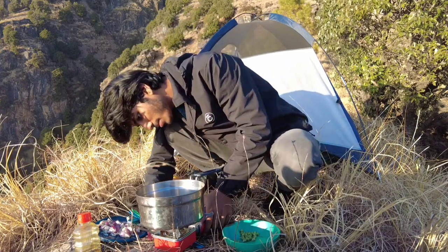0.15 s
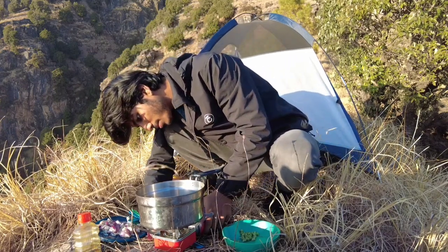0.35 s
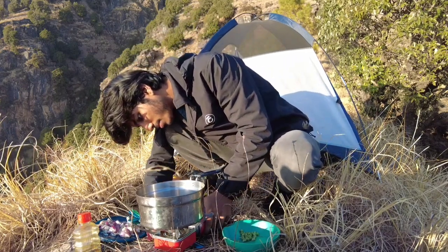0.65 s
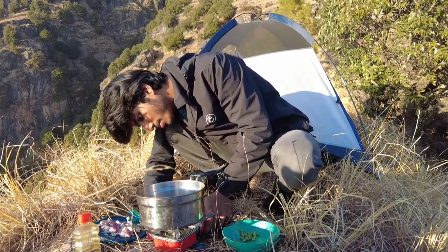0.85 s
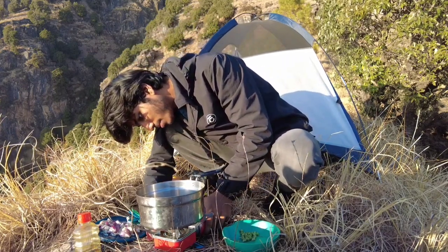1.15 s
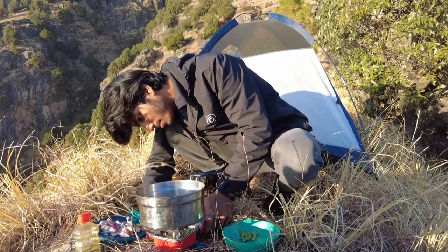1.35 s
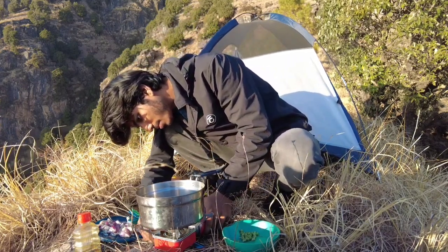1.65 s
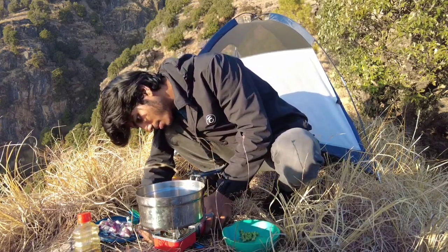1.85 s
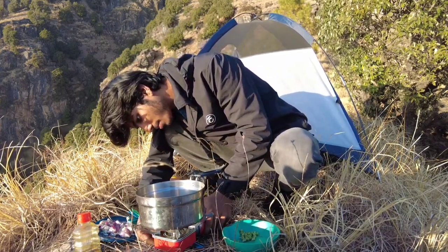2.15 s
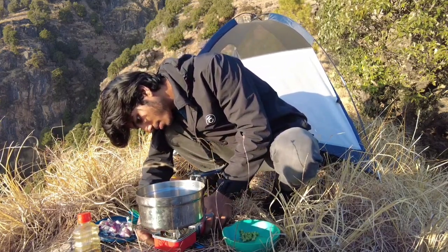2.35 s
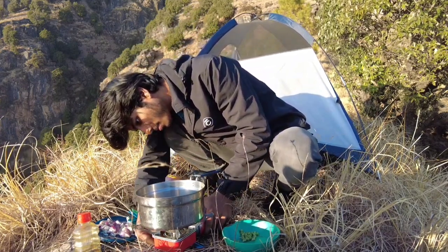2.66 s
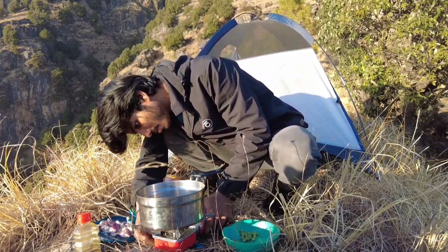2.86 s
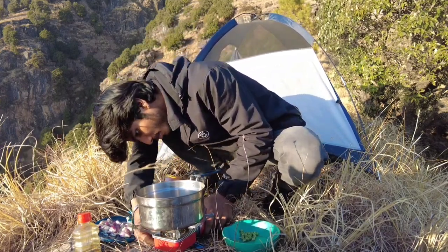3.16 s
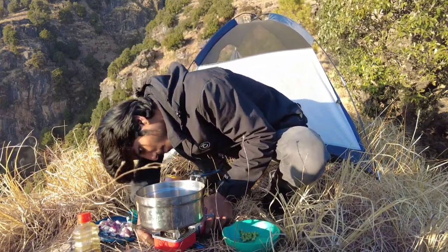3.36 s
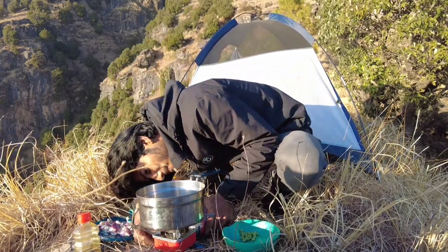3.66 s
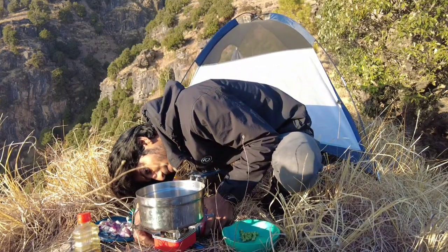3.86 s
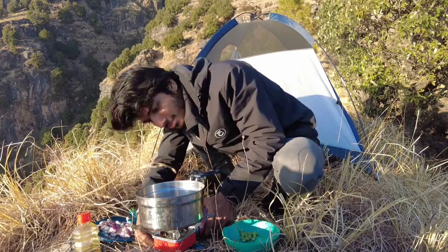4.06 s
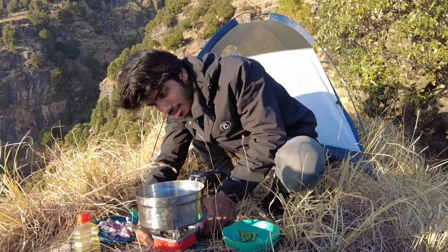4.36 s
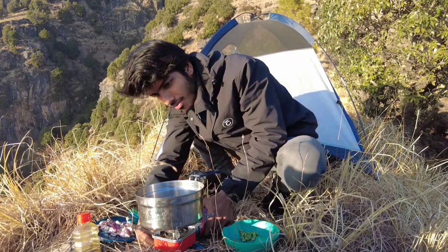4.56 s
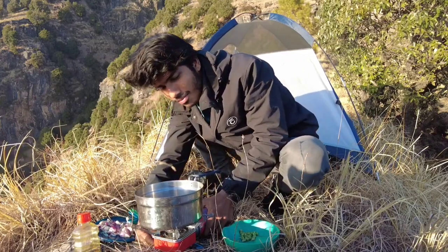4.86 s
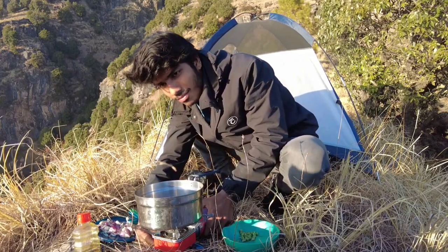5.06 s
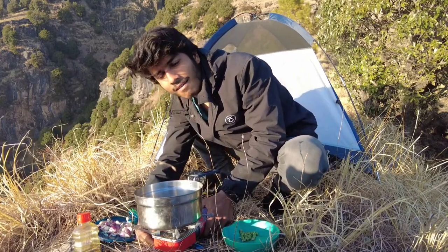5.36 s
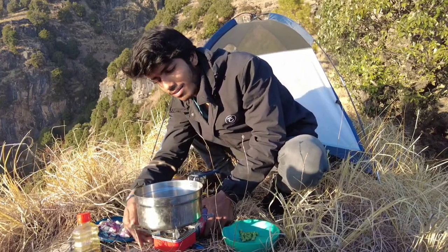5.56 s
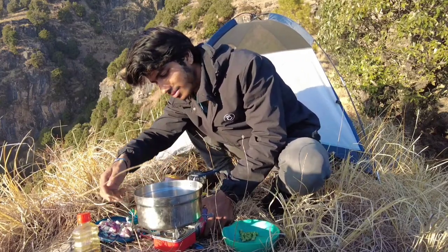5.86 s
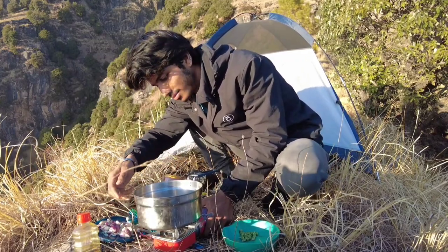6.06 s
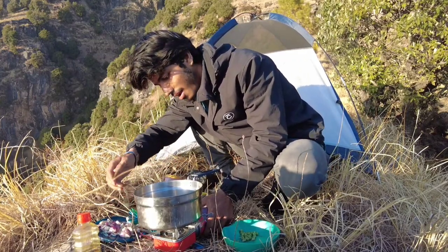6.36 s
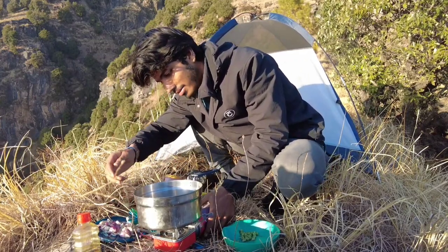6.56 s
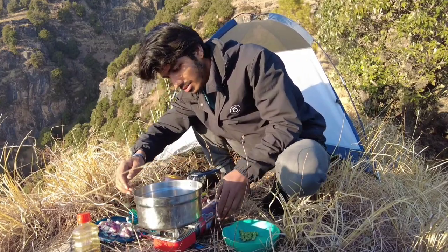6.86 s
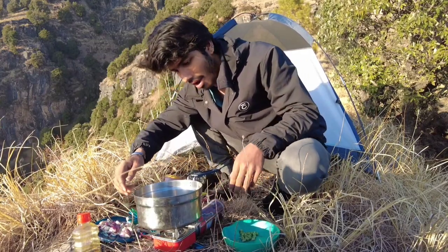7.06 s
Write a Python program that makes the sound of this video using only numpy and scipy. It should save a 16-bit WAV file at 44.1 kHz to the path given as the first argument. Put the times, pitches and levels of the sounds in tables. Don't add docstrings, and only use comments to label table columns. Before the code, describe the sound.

A small gas stove's igniter snaps eight times outdoors, each with a metallic ring and faint tick back, until gas catches with a low thump.

```python
import sys
import numpy as np
from scipy import signal
from scipy.fft import rfft, irfft
from scipy.io import wavfile
from scipy.ndimage import uniform_filter1d

SR = 44100
rng = np.random.default_rng(int(sys.argv[2]) if len(sys.argv) > 2 else 0)


def store_pcm(level_fs):
    pcm = np.round(np.clip(level_fs, -1, 1) * 32767).astype(np.int16)
    wavfile.write(sys.argv[1], SR, np.atleast_2d(pcm).T)


def convert_level_to_amplitude(level_db):
    exponent = np.asarray(level_db, float) / 20
    return 10 ** exponent


N = 318222

# t/s, peak level/dB, rattle level/dB, lead-in level/dB, pot level/dB
SNAPS = [
    (2.2938, -25, 6.5, -48, -32),
    (2.8259, -24, 4.5, -13.5, -35.5),
    (4.0403, -23.5, 6, -23.5, -33.5),
    (4.2994, -22, 2.5, -43, -38.5),
    (4.5279, -21, 0.5, -18.5, -35),
    (4.7591, -20.5, 1, -42, -34.5),
    (4.9922, -20, 2, -22, -37),
    (5.201, -20.5, 1.5, -20, -35),
]
# t/s, peak level/dB, lead-in level/dB
TICKS = [
    (2.5754, -44.5, -22),
    (3.0788, -41.5, -7),
    (4.2092, -36, -28),
    (4.4464, -38.5, -8),
    (4.6604, -37.5, -9),
    (4.8822, -37.5, -8),
    (5.1196, -40.5, -9),
    (5.3175, -38, -24),
]
# t/s, peak level/dB
TAPS = [
    (2.4756, -51),
    (3.0048, -53),
    (5.352, -50),
    (5.4907, -41),
]
# t/s, peak level/dB
STALKS = [
    (0.141, -57),
    (0.254, -54.5),
    (0.6887, -62.5),
    (0.9765, -63),
    (1.094, -58),
    (1.4367, -51),
    (3.649, -51.5),
    (3.7323, -43),
    (3.8651, -59),
]
# f/Hz, level/dB
RATTLE_TONE = [(150, -61), (400, -18), (900, -22.5), (1500, 3), (2200, -6.5), (4500, -3), (8000, -2),
               (12500, 1.5), (15600, 4.5), (16600, -9), (17200, -11)]
# f/Hz, level/dB
SCATTER_TONE = [(300, -54), (600, 3), (1300, -1), (2000, 5.5), (3000, 6), (5000, -0.5), (10000, -15.5),
                (16000, -14)]
# f/Hz, level/dB, t60/s
SHELL = [(738, -2.5, 0.014), (1296, -10, 0.087), (1614, -2.5, 0.039), (1781, -14, 0.08), (2665, 4, 0.021),
         (3380, -0.5, 0.029), (7570, 0.5, 0.023)]
FRAME = [(1200, -12, 0.18), (1195, -2.5, 0.22), (1316, 6, 0.065), (1332, -2.5, 0.2), (1535, 4.5, 0.14)]
POT = [(340, -5, .45), (490, 0, .5), (931, -4, .35), (1008, -1, .45), (1330, 1, .25)]
# f/Hz, phase/rad
SNAP_PHASE = [(300, 0.79), (1030, 1.1), (2000, 0.73), (4000, 1.26), (8000, 1.5), (13000, 2.04)]
# f/Hz, factor
SHADOW = [(300, .1), (1200, -.3), (2500, .5), (5000, .9), (14000, .8)]
# t/s, draw level/dB, draw length/ms, push level/dB, push length/ms
POCKETS = [
    (5.2, -60, 3, -28, 19),
    (5.2235, -23, 5.5, -22, 4.5),
    (5.233, -18.5, 6, -28, 2.5),
    (5.2412, -13.5, 8, -10.8, 11),
    (5.2675, -21, 15, -32, 14),
]
# t/s, level/dB
FLUTTER = [
    (5.2, -54),
    (5.22, -39),
    (5.236, -34),
    (5.252, -41),
    (5.28, -45),
    (5.3, -60),
    (5.35, -72),
    (5.5, -84),
]
# f/Hz, level/dB
FLAME_TONE = [(60, -22), (130, -8), (200, 4), (280, -10), (400, -5), (620, -9), (850, -19), (1300, -40)]
# f/Hz, level/dB
GAS_TONE = [(240, -51), (400, -19), (1250, -4), (2290, -8), (3120, -3.5), (3420, -3), (5690, -18.5),
            (16000, -22)]
# f/Hz, width/Hz, level/dB
BURNER = [(1375, 62, -2.5), (2470, 150, -1), (3138, 115, 2), (3610, 100, -4), (4080, 106, -3.5),
          (5586, 88, 1), (5980, 200, -6), (7780, 150, -6.5), (9050, 130, -6.5)]
# start t/s, open time/s, flow level/dB, sag/(dB/s)
VALVE = [
    (1.066, 0.026, -53, 1.5),
    (1.171, .2, -51.5, 42),
    (1.416, 0.383, -49, 26.5),
    (1.8, .15, -56.5, 9),
]
# t/s, level/dB
PILOT = [
    (1.07, -70.5),
    (2.2, -67.5),
    (3.3, -66),
    (4.0, -71.5),
    (4.8, -70.5),
    (5.18, -66),
    (5.4, -69),
    (6.0, -69),
    (7.22, -68),
]
# start t/s, length/s, level/dB
SHAKES = [
    (4.083, 1.38, -65.5),
    (6.898, .45, -65.5),
]
# f/Hz, width/Hz, level/dB
LOOSE = [(1060, 45, -5.5), (1160, 37, -5), (1330, 48, -1.5), (1470, 70, -2), (1580, 70, -6)]
# t/s, peak level/dB, f/Hz
KNOCKS = [
    (3.221, -29.5, 196),
    (3.2755, -38, 1500),
    (5.492, -42, 1630),
    (5.958, -38, 102),
    (6.631, -46, 1200),
    (6.863, -50, 184),
]
# t/s, level/dB
MOTION = [(0.0, -69), (0.35, -75), (0.7, -76), (0.73, -80.5), (1.05, -85), (1.1, -74.5), (1.34, -71.5),
          (1.5, -68), (3.09, -73.5), (3.21, -61), (3.45, -66), (3.75, -64.5), (4.06, -70), (5.31, -68.5),
          (6.1, -71.5), (6.25, -75.5), (6.86, -69.5), (7.1, -64)]
# f/Hz, level/dB
SWISH_TONE = [(150, -15), (400, -4), (700, 0), (1000, -4), (1400, 1), (1900, -2.5), (3000, -6), (6000, -20),
              (9000, -42)]
# f/Hz, level/dB
FIZZ_TONE = [(1000, -20), (2500, -1.5), (5000, 0), (9000, -1), (11500, -6), (14000, 0.5), (16500, -4)]
# t/s, peak level/dB, f/Hz
CHIRPS = [
    (0.3544, -67, 5470),
    (0.4823, -73, 5280),
    (0.5157, -67, 5240),
    (0.5626, -71, 5280),
    (0.6145, -67, 5320),
    (0.6898, -69, 5330),
    (0.7153, -69, 5400),
]
# f/Hz, level/dB
WIND_TONE = [(8.8, -27.5), (15, 2.5), (32, 2.5), (75, -7.5), (103, -5), (414, -27), (447, -36.5),
             (600, -26.5), (780, -78), (1320, -120)]
# middle t/s, half length/s, rise/dB
GUSTS = [
    (.45, 0.72, 2),
    (1.3, 0.21, 1.5),
    (2.9, 0.43, 4.5),
    (3.75, 0.27, 6.5),
    (4.64, 0.26, 3.5),
    (5.306, 0.23, 5.5),
    (5.785, 0.28, 8),
    (6.505, 0.16, 4.5),
    (7.026, 0.13, 6),
]
# f/Hz, likeness
SAME = [(60, 0.99), (180, 0.96), (550, 0.3), (1650, 0.7), (4970, 0.68), (15000, -0.31)]

PRESS_S = 0.026
PORT_LEAD_S = 3.4e-5


def evened(x):
    return x / np.sqrt(np.mean(x ** 2) + 1e-20)


def read(points, hz):
    f, value = np.transpose(points)
    return np.interp(np.log(hz + 1), np.log(f + 1), value)


def follow(rows):
    s, db = np.transpose(rows)
    return convert_level_to_amplitude(np.interp(np.arange(N) / SR, s, db, left=-150))


def add(mix, s, sound):
    part = mix[..., round(s * SR):][..., :sound.shape[-1]]
    part += sound[..., :part.shape[-1]]


def hiss(tone, size, patchy_db, flicker_db, peaks=(), peak_db=0):
    hop, hz = size // 4, np.fft.rfftfreq(size, 1 / SR)
    frames = N // hop + 5
    a, b, c, d, patches = rng.standard_normal((frames, len(hz), 5)).T
    patches = uniform_filter1d(patches, size=size // 64, axis=0)
    patches = evened(uniform_filter1d(patches, size=4096 // size + 4, axis=1))
    flicker = evened(uniform_filter1d(rng.standard_normal(frames), size=3))
    power = convert_level_to_amplitude(2 * read(tone, hz))
    for f, width, db in peaks:
        power += convert_level_to_amplitude(2 * (db + peak_db)) / (1 + (2 * (hz - f) / width) ** 2)
    same = np.clip(abs(read(SAME, hz)), 0, 1)[:, None]
    late = np.exp(-2j * np.pi * hz * PORT_LEAD_S)[:, None]
    left = a + 1j * b
    right = late * (same * left + np.sqrt(1 - same ** 2) * (c + 1j * d))
    z = np.array([left, right])
    z *= np.sqrt(power)[:, None] * convert_level_to_amplitude(patchy_db * patches + flicker_db * flicker)
    return evened(signal.istft(z, nperseg=size, noverlap=size - hop)[1][:, :N])


def ring(modes, spread_db, fuzz, t):
    hz, db, t60 = np.transpose(modes)[:, :, None]
    level_luck, pitch_luck = rng.standard_normal((2, len(modes), 1))
    waver = uniform_filter1d(rng.standard_normal((len(modes), len(t))), size=250)
    waver = 1 + fuzz * evened(uniform_filter1d(waver, size=150))
    onset = (1 - np.exp(-t / 0.00072)) ** 2
    level = convert_level_to_amplitude(db + spread_db * level_luck - 60 * t / t60) * onset
    return (level * waver * np.sin(2 * np.pi * hz * (1 + 0.0058 * pitch_luck) * t)).sum(0)


def click(db, rattle_db, press_db, run_up_ms, t60_ms, shell_db, frame_db, pot_db, pan_db, scatter_db=-16):
    t = np.arange(2 ** 14) / SR - PRESS_S
    run_up_ms = max(run_up_ms, 0.3)
    since = t - run_up_ms / 1000
    rise_db = 14 * since / run_up_ms * 1000 - 3000 * np.maximum(-t, 0)
    shape = convert_level_to_amplitude(np.where(since < 0, rise_db, -60000 * since / max(t60_ms, 5)))
    press = convert_level_to_amplitude(press_db + 570 * t) * (since < 0)
    hits = rng.standard_normal(len(t)) * convert_level_to_amplitude(1.8 * rng.exponential(1, len(t)))
    rattle = evened(hits) * (shape + press) + 0.5 * shape * rng.standard_normal((2, len(t)))
    scatter = rng.standard_normal((2, len(t))) * convert_level_to_amplitude(scatter_db - 60 * since / 0.2) * (since > 0)
    hz = np.fft.rfftfreq(len(t), 1 / SR)
    noise = convert_level_to_amplitude(rattle_db + read(RATTLE_TONE, hz)) * rfft(rattle)
    noise = noise + convert_level_to_amplitude(read(SCATTER_TONE, hz)) * rfft(scatter)

    after = np.maximum(since + 0.0026, 0)
    metal = convert_level_to_amplitude(shell_db) * ring(SHELL, 1.2, 0.3, after)
    metal += convert_level_to_amplitude(frame_db) * ring(FRAME, 1.2, 0.8, after)
    metal += convert_level_to_amplitude(pot_db) * ring(POT, 1.2, 0.2, after)
    bounce = np.roll(metal, round(rng.uniform(0.0047, 0.014) * SR)) * 0.28
    phase = np.exp(np.outer([0, -1j], read(SNAP_PHASE, hz)))
    ports = phase * convert_level_to_amplitude(np.outer([0.5, -0.5], pan_db * read(SHADOW, hz)))
    return convert_level_to_amplitude(db - 4.5) * irfft(ports * (noise + rfft(metal + bounce)), len(t))


def igniter():
    out = np.zeros((2, N))
    for s, db, rattle_db, press_db, pot_db in SNAPS:
        snap = click(db, rattle_db, press_db, run_up_ms=4.1, t60_ms=29,
                     shell_db=-1.5, frame_db=-19, pot_db=pot_db, pan_db=3.5)
        add(out, s - PRESS_S, snap)
    for s, db, press_db in TICKS:
        tick = click(db, 0.64, press_db, run_up_ms=1.814, t60_ms=43,
                     shell_db=-3, frame_db=-15, pot_db=-47, pan_db=0.5, scatter_db=-9)
        add(out, s - PRESS_S, tick)
    for s, db in TAPS:
        tap = click(db, -16, -30, run_up_ms=1.54, t60_ms=23,
                    shell_db=-7, frame_db=-19, pot_db=-43, pan_db=0.8, scatter_db=-18)
        add(out, s - PRESS_S, tap)
    for s, db in STALKS:
        stalk = click(db, 2.3, -14, run_up_ms=4.3, t60_ms=73,
                      shell_db=-22, frame_db=-42, pot_db=-60, pan_db=1.0)
        add(out, s - PRESS_S, stalk)
    return out


def puff(ms):
    return np.sin(np.pi * np.arange(0, 1, 1000 / ms / SR) ** 0.6)


def ignition():
    thump = np.zeros(N)
    for s, draw_db, draw_ms, push_db, push_ms in POCKETS:
        add(thump, s, np.r_[-convert_level_to_amplitude(draw_db) * puff(draw_ms), convert_level_to_amplitude(push_db) * puff(push_ms)])
    thump = uniform_filter1d(uniform_filter1d(thump, size=60), size=80)
    flame = hiss(FLAME_TONE + [(3000, -70)], size=512, patchy_db=1.0, flicker_db=0.5)
    return thump * convert_level_to_amplitude([[-1.1], [1.1]]) + flame * follow(FLUTTER)


def gas_flow():
    t = np.arange(N) / SR
    open_s, close_db_per_s = 0.028, 207
    power = follow(PILOT) ** 2
    for s, held_s, db, sag in VALVE:
        choke_db = close_db_per_s * np.maximum(t - s - held_s, 0)
        rush = np.clip((t - s) / open_s, 0, 1) * convert_level_to_amplitude(db - sag * abs(t - s) - choke_db)
        power += rush ** 2
    return np.sqrt(power)


def gas():
    jet = hiss(GAS_TONE, size=1024, patchy_db=2.0, flicker_db=0.56, peaks=BURNER, peak_db=2.5)
    return jet * gas_flow() * convert_level_to_amplitude(0.5) * convert_level_to_amplitude([[0.8], [-0.8]])


def buzz():
    t, fade_s = np.arange(N) / SR, 0.12
    held = np.zeros(N)
    for s, length, db in SHAKES:
        held += convert_level_to_amplitude(db) * np.clip(np.minimum(t - s, s + length - t) / fade_s, 0, 1)
    bed = [(500, -50), (1300, -25), (3000, -45)]  # f/Hz, level/dB
    return held * hiss(bed, size=2048, patchy_db=3.0, flicker_db=1.5, peaks=LOOSE)


def knocks():
    out, t = np.zeros(N), np.arange(2000) / SR
    for s, db, hz in KNOCKS:
        add(out, s, -convert_level_to_amplitude(db - 7.0 - 60 * t / 0.02) * np.sin(2 * np.pi * hz * t))
    return out


def jacket_and_grass():
    still_db, grass_db, grass_share = -70.5, -70, 0.74
    moving = follow(MOTION)
    swish = hiss(SWISH_TONE, size=512, patchy_db=-0.5, flicker_db=1.5) * moving * convert_level_to_amplitude(1.0)
    grass = convert_level_to_amplitude(grass_db + 3.5) * (moving / convert_level_to_amplitude(still_db)) ** grass_share
    return swish + hiss(FIZZ_TONE, size=256, patchy_db=3.5, flicker_db=1.5) * grass


def insect():
    out, t = np.zeros(N), np.arange(500) / SR
    for s, db, hz in CHIRPS:
        add(out, s, convert_level_to_amplitude(db - 2.0) * np.hanning(len(t)) * np.sin(2 * np.pi * hz * t))
    return out


def wind():
    t, calm_db = np.arange(N) / SR, -63.5
    rise_db = sum(db * np.exp(-((t - s) / half_s) ** 2) for s, half_s, db in GUSTS)
    rumble = hiss(WIND_TONE, size=2048, patchy_db=1.9, flicker_db=0.67)
    return rumble * convert_level_to_amplitude(calm_db + rise_db) * convert_level_to_amplitude(-1.08)


def scene():
    stove = igniter() + ignition() + gas() + buzz()
    return stove + knocks() + jacket_and_grass() + insect() + wind()


def low_pass(x):
    return signal.sosfilt(signal.butter(12, 16810, fs=SR, output="sos"), x)


def record(dry):
    edge = signal.firwin(301, 15900, window=("kaiser", 2.5), fs=SR)
    mix = signal.oaconvolve(dry, edge[None], "same")
    return low_pass(mix)


dry = scene()
out = record(dry)
store_pcm(out)
```